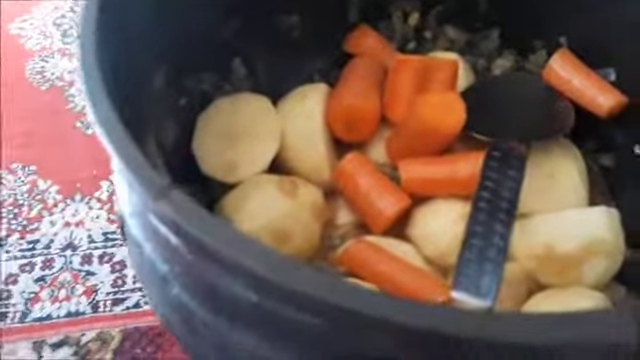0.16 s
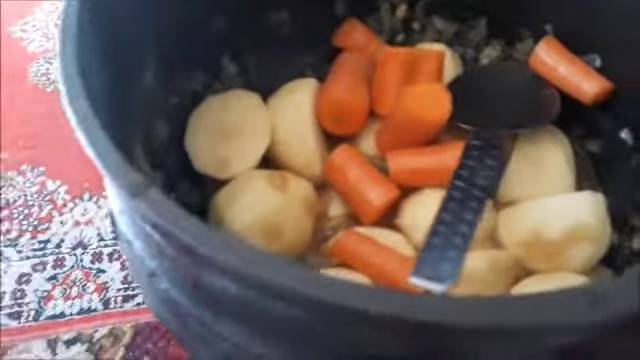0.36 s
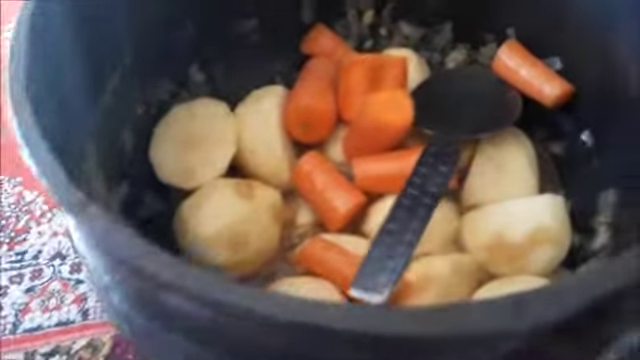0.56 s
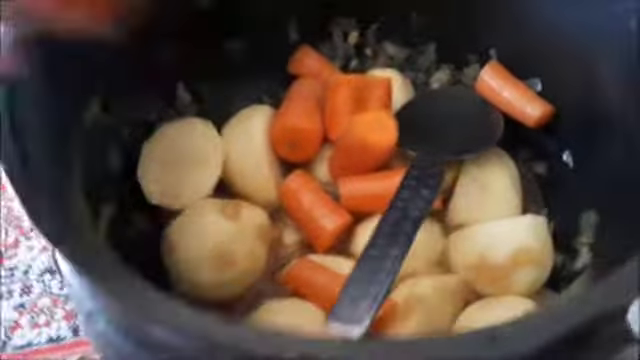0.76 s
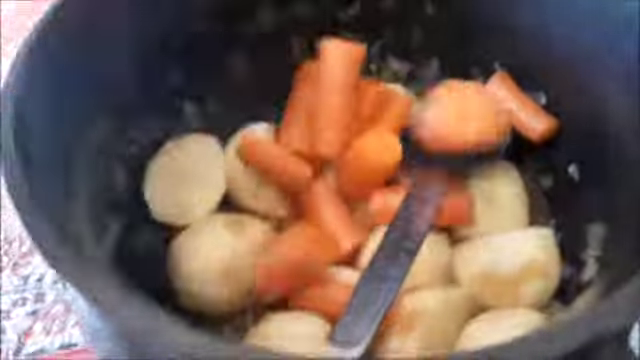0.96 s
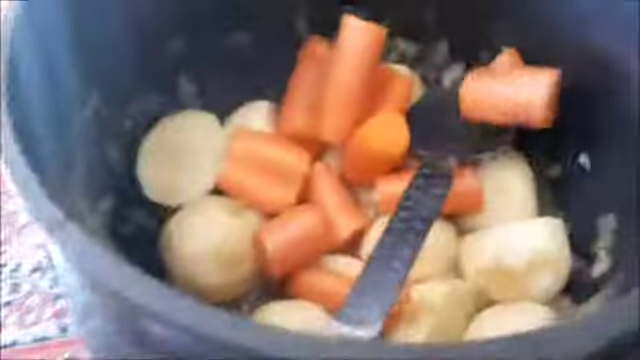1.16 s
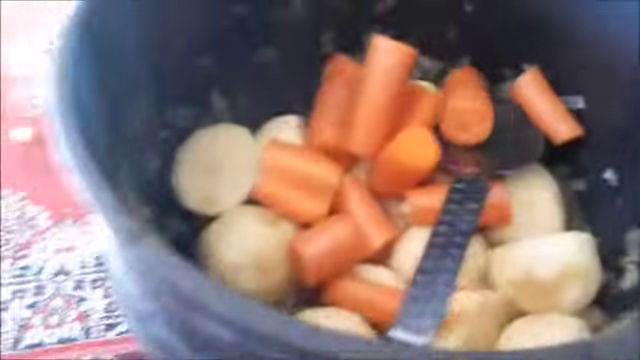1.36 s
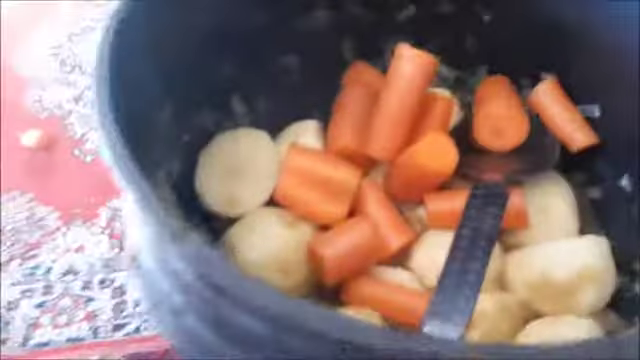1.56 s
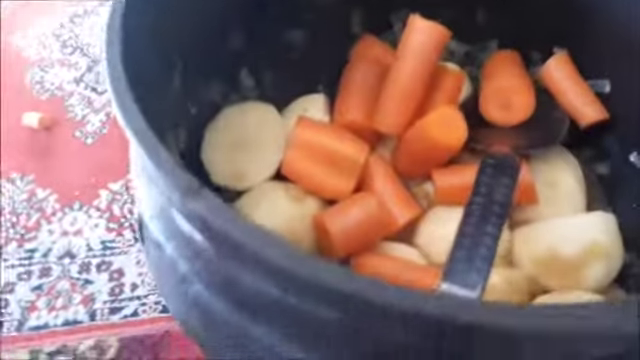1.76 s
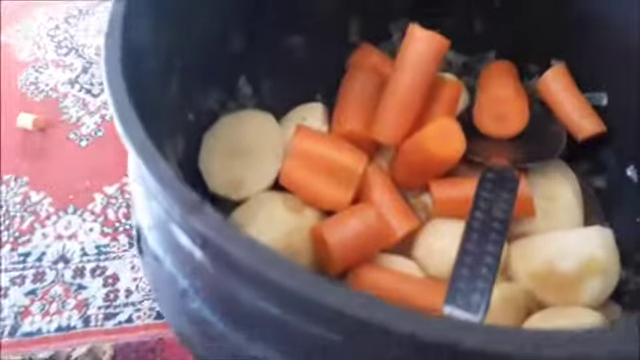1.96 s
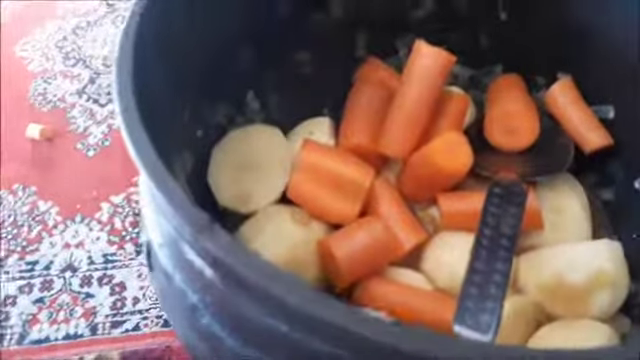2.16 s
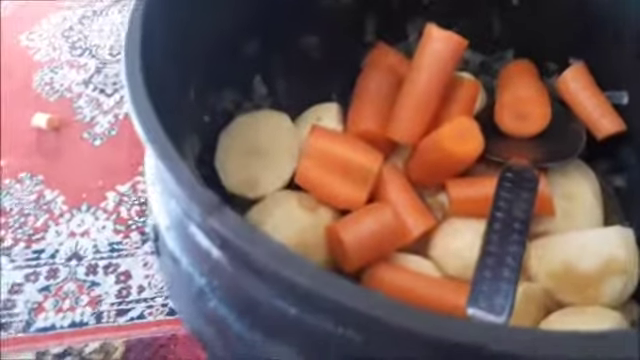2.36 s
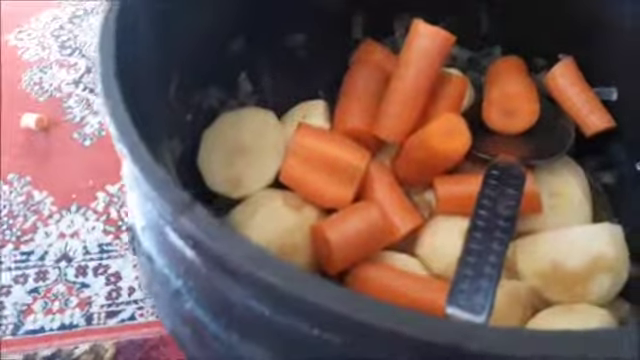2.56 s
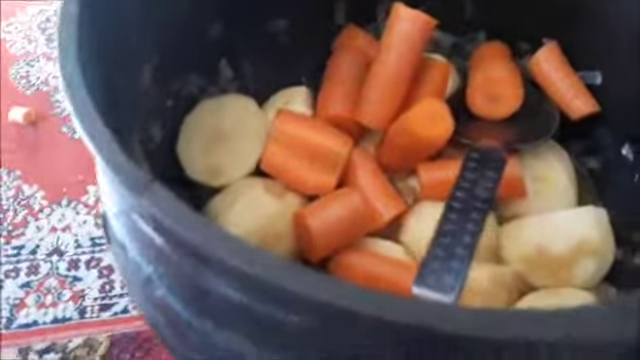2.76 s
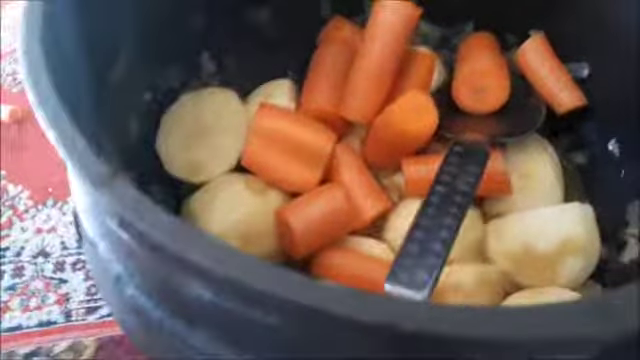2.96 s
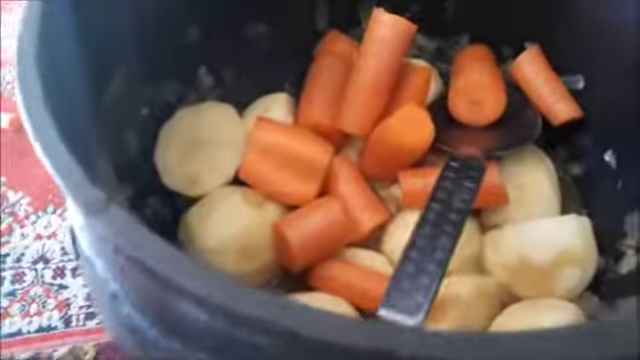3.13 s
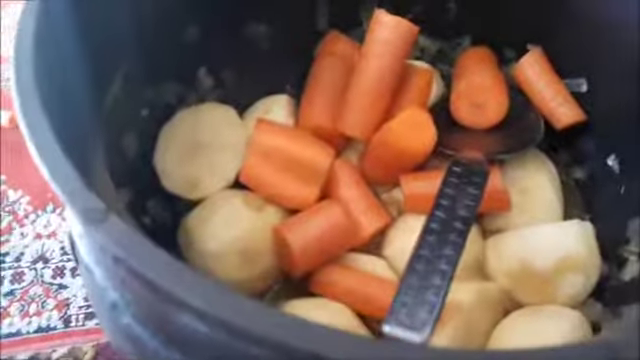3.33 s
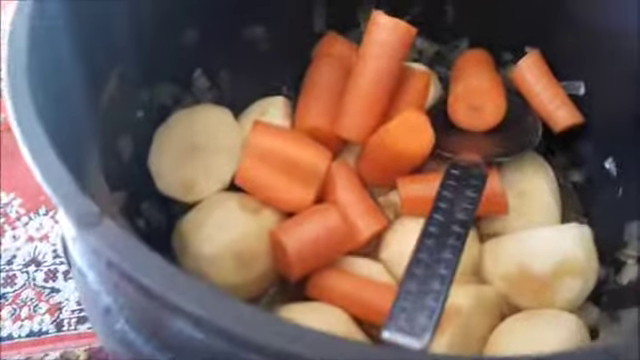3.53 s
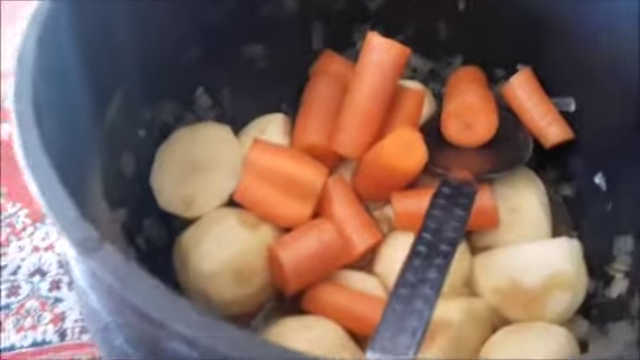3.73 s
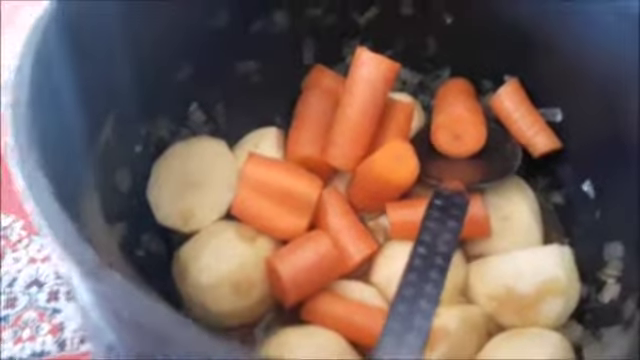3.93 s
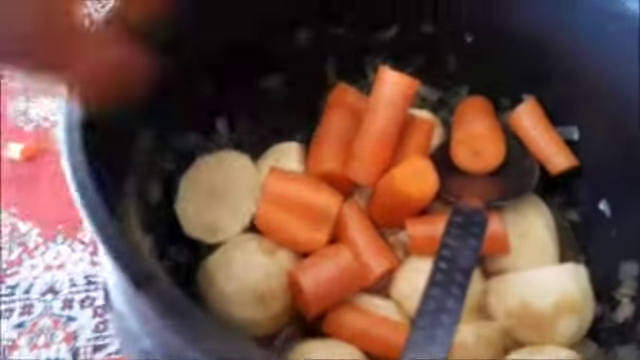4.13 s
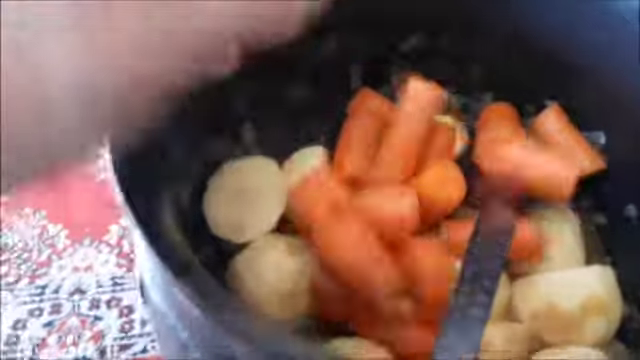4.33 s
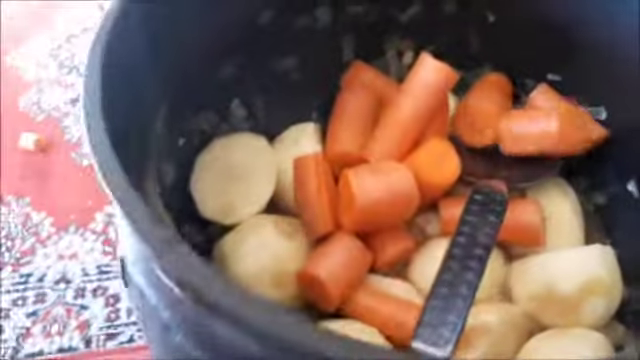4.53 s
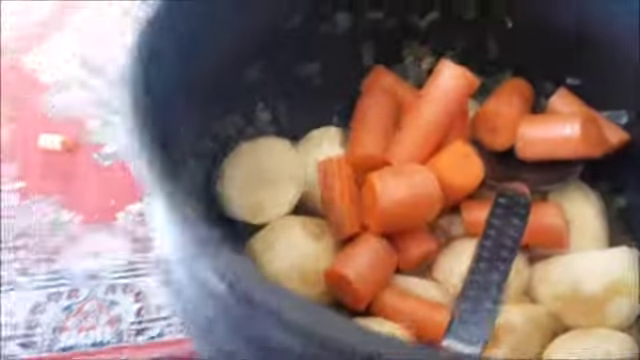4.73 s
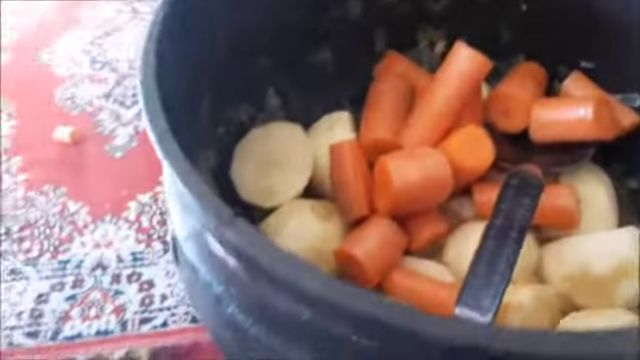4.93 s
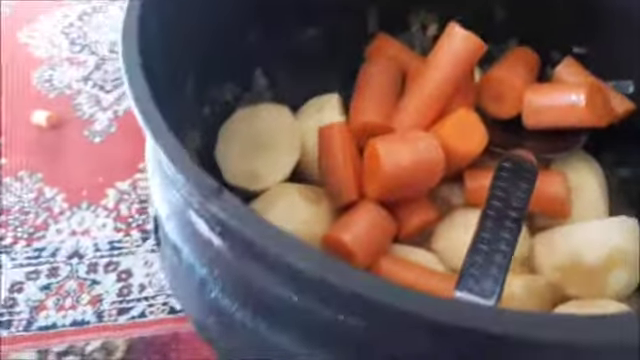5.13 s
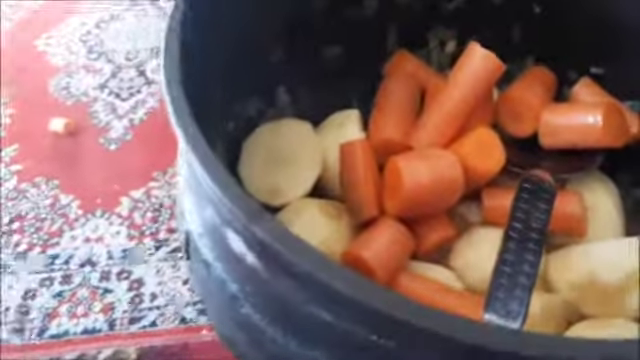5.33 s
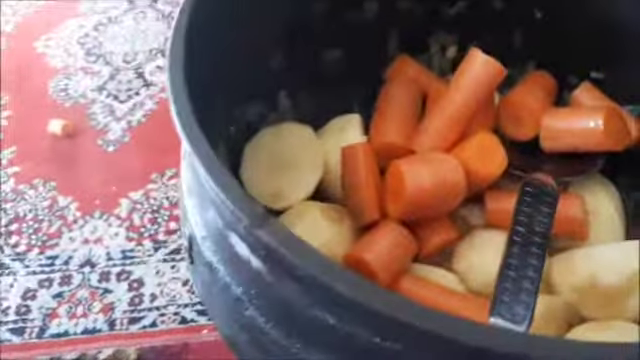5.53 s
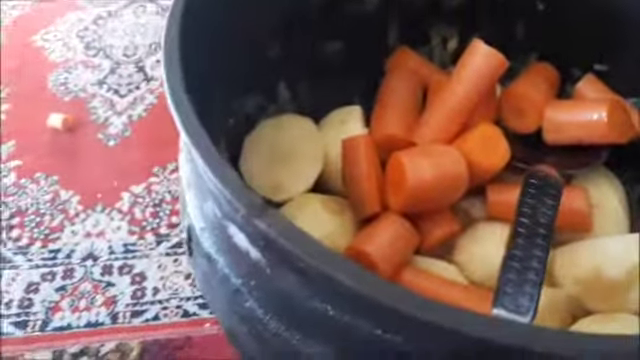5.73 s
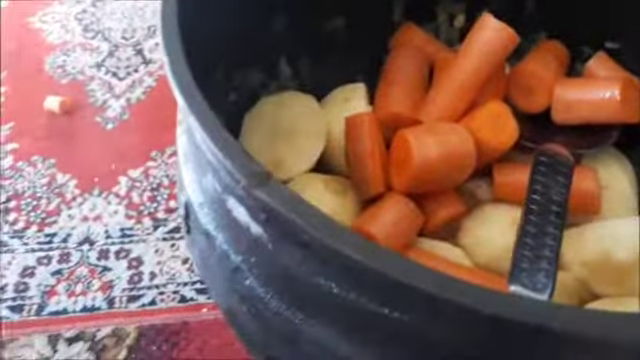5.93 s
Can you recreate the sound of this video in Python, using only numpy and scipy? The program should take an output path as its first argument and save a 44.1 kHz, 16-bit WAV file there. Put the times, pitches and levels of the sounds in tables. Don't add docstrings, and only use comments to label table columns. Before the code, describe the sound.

A quiet outdoor yard opens with a low hollow hum, airy hiss, distant high insect chirring and a slight cloth rustle with faint chirps. A soft knock comes at 0.4 seconds and thin peeps around 0.75. Just before 1.0, a handful of carrot pieces falls into a cast iron pot: dull vegetable thuds, then a dense bright clatter of steel spoon on iron until about 1.2, with a short hollow ring. Lighter rolling clinks follow at 1.3-1.45. The background dips, then creeps back, with tiny squeaks near 1.6. A close, thin insect buzz swells at 2.6-3.0, among faint leaf rustles and dry crackles until 3.2. At 4.4 a second handful lands with heavier low thumps and a compact metallic rattle; at 4.65 the spoon slips, knocking the wall briefly. The yard sinks quieter, then gently returns, with a soft rustle near 5.9. Close small microphone, little echo.

```python
import sys
import numpy as np
from scipy import signal
from scipy.fft import rfft, irfft
from scipy.io import wavfile
from scipy.ndimage import uniform_filter1d

SR = 44100
rng = np.random.default_rng(int(sys.argv[2]) if len(sys.argv) > 2 else 0)


def persist_wave(psi):
    counts = np.round(np.clip(psi, -1, 1) * 32767).astype(np.int16)
    wavfile.write(sys.argv[1], SR, np.atleast_2d(counts).T)


def rack_gain(trim_db):
    fader = np.asarray(trim_db, float)
    return 10 ** (fader / 20)


N = 268569


def evened(x):
    return x / np.sqrt(np.mean(x ** 2) + 1e-20)


def read_curve(points, hz):
    f, value = np.transpose(points)
    return np.interp(np.log(hz + 1), np.log(f + 1), value)


def add(mix, start_s, sound):
    part = mix[round(start_s * SR):][:len(sound)]
    part += sound[:len(part)]


def coloured(x, points):
    hz = np.fft.rfftfreq(len(x), 1 / SR)
    return irfft(rfft(x) * rack_gain(read_curve(points, hz)), len(x))


def ring(x, hz, t60):
    radius = 10 ** (-3 / (max(t60, .003) * SR))
    step = 2 * np.pi * hz / SR
    return signal.lfilter([np.sin(step)], [1, -2 * radius * np.cos(step), radius ** 2], x)


def resonate(x, hz, width_hz):
    turn = np.exp(2j * np.pi * np.cumsum(hz * np.ones(len(x))) / SR)
    r = np.exp(-np.pi * width_hz / SR)
    smooth = signal.lfilter([(1 - r) ** 2], [1, -2 * r, r * r], x / turn)
    return 2 * (turn * smooth).real


def gliding_noise(length_s, start_hz, end_hz, level_db, width_hz):
    size = round(length_s * SR)
    hz = np.interp(np.arange(16384), [0, size], [start_hz, end_hz])
    fuzz = evened(resonate(rng.standard_normal(16384), hz, width_hz))[:size]
    return rack_gain(level_db) * fuzz * signal.windows.tukey(size, .3) * np.linspace(1, .45, size)


def porch(x, t60=0.28):
    t = np.arange(SR // 2) / SR
    tail = rng.standard_normal(len(t)) * rack_gain(-60 * t / t60) * (1 - np.exp(-t / 0.024))
    return signal.oaconvolve(x, tail / np.linalg.norm(tail))[:len(x)]


# time_s, level_db
YARD_LEVEL = [(0, 1.5), (.14, 3), (.29, 1), (.43, 2.5), (.7, 1.5), (.9, 3.5), (1.3, 3.4), (1.58, -2.5),
              (1.9, 0), (2.35, 0.1), (2.9, 2.5), (3.24, 0.9), (4.36, 1.2), (4.9, -6), (5.27, -4), (5.55, -0.8),
              (5.95, -.4), (6.09, 3.5)]


def yard_level_db(time_s):
    return np.interp(time_s, *np.transpose(YARD_LEVEL))


# freq_hz, density_db (per Hz)
YARD_SPECTRUM = [(15, -56.5), (25, -30.5), (102, -15.5), (357, -5.5), (456, -15), (1120, -10),
                 (1280, -11.5), (3300, -19), (3780, -15.5), (4100, -29.5), (7650, -34), (8530, -33.5),
                 (9770, -45.5), (15100, -32.5), (16400, -58)]
# freq_hz, width_hz, lift_db
POT_CAVITY = [
    (260, 17, 3.5),
    (372, 44, 6.5),
    (800, 74, 7),
    (1051, 30, 6),
    (2110, 61, 8),
]
# rest_db, level_share (dB per dB of the yard's level curve)
YARD_LAYERS = [
    (-52.5, 1.06),
    (-55., 1.02),
    (-59., 1.04),
]


def yard():
    frames, hz = N // 256 + 5, np.fft.rfftfreq(1024, 1 / SR)
    real, imag, patches = rng.standard_normal((frames, 513, 3)).T
    patches = uniform_filter1d(patches, 10, 0)
    patches = evened(uniform_filter1d(patches, 8, 1))
    bed_db = yard_level_db(np.arange(frames) * 256 / SR)
    shape_db = read_curve(YARD_SPECTRUM, hz)
    for f, width_hz, lift_db in POT_CAVITY:
        shape_db = shape_db + lift_db / (1 + (2 * (hz - f) / width_hz) ** 2)
    level = np.zeros(real.shape)
    for (rest_db, share), (low, high) in zip(YARD_LAYERS, ((0, 600), (600, 3600), (3600, SR))):
        band = rack_gain(shape_db) * (hz >= low) * (hz < high)
        level += np.outer(band / np.linalg.norm(band), rack_gain(rest_db + share * bed_db))
    spectra = level * (real + 1j * imag) * rack_gain(1.7 * patches)
    return 0.76 * signal.istft(spectra, nperseg=1024, noverlap=768)[1][:N]


# freq_hz, width_hz, level_db
FAR_INSECTS = [
    (3810, 450, -69.5),
    (8626, 380, -68),
]


def chorus():
    swell = rack_gain(0.98 * yard_level_db(np.arange(N) / SR))
    bands = np.zeros(N)
    for hz, width_hz, level_db in FAR_INSECTS:
        bands += rack_gain(level_db) * evened(resonate(rng.standard_normal(N), hz, width_hz))
    return swell * bands


# start_s, length_s, peak_db, pitch_hz
NEAR_BUZZ = [
    (0.0, .35, -63, 8900),
    (1.784, .17, -58, 8900),
    (2.58, .47, -43.5, 9200),
]


def buzz(length_s, peak_db, pitch_hz):
    t = np.arange(0, length_s, 1 / SR)
    from_peak = np.interp(t / length_s, [0, 0.44, 1], [1, 0, 1])
    wobble, noise = rng.standard_normal((SR // 2, 2))[:len(t)].T
    stroke_hz = 85 * (1 + 0.57 * evened(uniform_filter1d(wobble, 600)))
    strokes = np.cumsum(stroke_hz) / SR
    clicks = noise * (.5 + np.exp(-(strokes % 1) / 0.84))
    wing_hz = pitch_hz - 1300 * t - 700 * np.exp(-t / .035)
    wings = resonate(resonate(clicks, wing_hz, 640), wing_hz, 640)
    level = rack_gain(peak_db - 29.5 * from_peak ** 2.4)
    return level * evened(wings) * signal.windows.tukey(len(t), .1)


# start_s, length_s, centre_hz, level_db, width_hz
RUSTLES = [
    (0.049, 0.14, 345, -45.5, 352),
    (0.037, 0.1, 1260, -52.5, 1780),
    (0.045, 0.11, 6130, -59.5, 4000),
    (2.664, .33, 6520, -61, 3520),
    (3.131, 0.1, 9220, -62.5, 4000),
    (5.926, 0.18, 800, -57.5, 893),
]


def rustle(length_s, centre_hz, level_db, width_hz):
    return gliding_noise(length_s, centre_hz, centre_hz, level_db, width_hz)


# start_s, length_s, start_hz, end_hz, level_db
PEEPS = [
    (0.041, 0.025, 1590, 1630, -44),
    (0.053, 0.063, 1970, 2180, -56),
    (0.152, 0.113, 6250, 6550, -59.5),
    (0.738, 0.1, 4320, 4200, -58),
    (0.802, 0.088, 4750, 4800, -61),
    (1.523, 0.095, 3980, 3850, -57),
    (1.607, 0.051, 5900, 6260, -64),
    (1.65, .04, 5720, 5700, -67.5),
    (1.703, 0.083, 4910, 5140, -63.5),
]


def peep(length_s, start_hz, end_hz, level_db):
    return gliding_noise(length_s, start_hz, end_hz, level_db, width_hz=210)


# start_s, level_db, pitch_hz, t60_s, tick_db
THUDS = [(0.043, -47.5, 331, 0.079, 6), (0.384, -33.5, 313, 0.04, 1), (.404, -35.5, 260, 0.1, -28.),
         (.943, -35.5, 1150, 0.022, -5.), (.978, -25.5, 385, 0.05, -4), (1.01, -26.5, 870, 0.068, -31.5),
         (1.021, -28.5, 430, 0.11, -25.), (1.104, -31.5, 800, 0.031, -28), (4.383, -19.5, 374, 0.017, 0.5),
         (4.400, -22.5, 304, 0.026, -25), (4.417, -18, 415, 0.025, -24.5), (4.455, -46, 856, 0.24, -29),
         (4.44, -36.5, 197, 0.23, -29.5), (1.385, -55, 870, 0.11, -30), (4.647, -35.5, 888, 0.021, -4),
         (4.668, -37.5, 450, 0.036, -30)]


def thud(level_db, pitch_hz, t60, tick_db):
    t = np.arange(6000) / SR
    puff = rng.standard_normal(len(t))
    push = np.sin(2 * np.pi * pitch_hz * t) + .5 * evened(resonate(puff, pitch_hz, 430))
    push = push * rack_gain(-60 * t / max(t60, .01)) * (1 - np.exp(-t / 0.00057))
    dull_tick = coloured(puff, [(500, 0), (4500, -5), (6500, -30)]) * np.exp(-t / .003)
    return rack_gain(level_db) * (push + rack_gain(tick_db) * dull_tick)


def rebounds(blows, chatter_s, full_db, bright_db):
    rows = np.zeros((len(blows), 3 * SR // 4))
    t = np.arange(4096) / SR - .002
    for row, (start_s, level_db, edge_db) in zip(rows, blows):
        low_db = full_db - 0.58 * level_db
        chance, sign = rng.random(len(t)), rng.standard_normal(len(t))
        envelope = np.exp(-t / max(chatter_s, .001)) * (1 - np.exp(-abs(t) / .0006))
        burst = sign * (chance < 4000 / SR) * np.where(t > 0, envelope, 0)
        colour = [(300, low_db - 22.5), (2000, low_db + 8.5), (5500, edge_db), (8500, 0),
                  (13000, 0.94 * edge_db + bright_db)]
        burst = coloured(burst / np.linalg.norm(burst), colour)
        add(row, start_s - blows[0][0], rack_gain(level_db) * burst)
    return rows


def struck(rows, spread_db):
    return rack_gain(spread_db * rng.standard_normal(len(rows))) @ rows


def metal(rows, modes, body_db):
    out = np.zeros(rows.shape[1])
    for hz, level_db, t60 in modes:
        blow = struck(rows, 3)
        free_t60 = t60 * min(1, (1800 / hz) ** 0.34)
        out += rack_gain(body_db + level_db) * ring(blow, hz, free_t60)
        out += rack_gain(body_db + 1.2 * level_db + 8.5) * ring(blow, 1.003 * hz, min(1.4 * t60, .09))
    return out


# freq_hz, level_db, t60_s
POT_BELLY = [
    (483.7, -49, 0.46),
    (870, -51, 0.19),
    (1326, -56, .45),
    (2386, -63.5, 0.6),
]


def pot_belly(rows, belly_db):
    drive = rows.sum(0)
    return sum(rack_gain(level_db + belly_db) * ring(drive, hz, t60) for hz, level_db, t60 in POT_BELLY)


# freq_hz, level_db, t60_s
SPOON_MODES = [(1373, -21, 0.38), (1330, -27, 0.47), (2462, -41.5, 2.3), (3613, -3, 0.27),
               (4360, -22.5, 0.29), (4673, -55, 0.21), (5132, 3.5, 0.19), (5660, 1.5, 0.28),
               (6190, -7.5, 0.35), (7913, -24.5, 0.22), (8220, -44.5, 0.13), (8550, -2.5, 0.21),
               (8950, -32.5, 0.15), (8900, -30, 0.22), (8830, -1.5, 0.39), (9200, -46.5, 0.13),
               (9660, -28.5, 0.15), (9940, -7, 0.25), (10370, -45.5, 0.26), (10860, -2, 0.25),
               (11210, -38, 0.11), (12010, 7.5, 0.38), (12100, -40, 0.14), (13260, -40.5, 0.17),
               (13500, -22, 0.11), (15600, -12, 0.13), (14008, -4.5, 0.3), (14700, -23, 0.16),
               (14600, -24.5, 0.14), (15170, -7, 0.18)]


def spoon(rows, spoon_db):
    return metal(rows, SPOON_MODES, spoon_db)


# freq_hz, level_db, t60_s
POT_MODES = [(1313, -15.5, 1), (1344, -4, 0.21), (2108, -3, 0.28), (2388, -4.5, 0.67), (3148, -29.5, 0.18),
             (3600, -26, 0.38), (3663, -7, 0.35), (4570, -13, .45), (5270, -12.5, 0.42), (5450, 3.5, 0.22),
             (5620, -8.5, 0.21), (6080, -20, 0.57), (6471, -27, 0.17), (6680, -8, 0.28), (7790, -5.5, 0.25),
             (8340, -41, 0.15), (7850, -19, 0.23), (8406, 1.5, 0.44), (8850, -11, 0.59), (9900, -4, 0.26),
             (11300, -24.5, 0.31), (11000, -23, 0.22), (11300, -20, 0.37), (11965, -2.5, 0.2),
             (13300, -8, 0.2), (12970, -17.5, 0.082), (13630, -9.5, 0.3), (14400, -32, 0.19),
             (14590, -31, 0.2), (14200, -11.5, 0.076)]


def pot_wall(rows, pot_db):
    return metal(rows, POT_MODES, pot_db)


# freq_hz, width_hz, level_db
CLATTER_CLUSTERS = [(1270, 38, -39.5), (2165, 39, -4.5), (2504, 32, -7.5), (3100, 60, -12.5),
                    (3458, 53, -19), (4527, 34, -1.5), (5000, 34, -6), (5830, 36, -0.5), (5800, 45, -4.5),
                    (6340, 58, 1), (6830, 37, -6.5), (1684, 70, -7), (8250, 22, -15), (8390, 60, 3),
                    (8760, 44, -4.5), (10050, 39, -3), (11000, 65, -3.5), (12025, 45, -8),
                    (12900, 60, -4.5), (13080, 67, -17.5), (13650, 37, -2), (13600, 39, -14),
                    (14530, 84, 6), (16100, 40, -8)]


def clatter(rows, clatter_db):
    out = np.zeros(rows.shape[1])
    for hz, width_hz, level_db in CLATTER_CLUSTERS:
        blow = struck(rows, 4)
        for spread, t60 in zip(np.linspace(-1.6, 1.6, num=6), rng.uniform(0.031, 0.075, size=6)):
            gain = rack_gain(level_db + clatter_db - 2.9 * spread ** 2)
            out += gain * ring(blow, hz + spread * max(width_hz, 90.), t60)
    return out


def tumble(blows, chatter_s, full_db, spoon_db, pot_db, clatter_db, bright_db, belly_db):
    rows = rebounds(blows, chatter_s, full_db, bright_db)
    out = pot_belly(rows, belly_db) + spoon(rows, spoon_db) + pot_wall(rows, pot_db) + clatter(rows, clatter_db)
    out += rack_gain(clatter_db + 21.5) * porch(rows.sum(0), t60=.05)
    return blows[0][0] - .0035, out + rack_gain(-22.0) * porch(out)


# start_s, level_db, edge_db (weight near 5.5 and 13 kHz against 8.5 kHz)
FIRST_BLOWS = [(0.9822, -20.5, -2), (0.9926, -15, -5), (1.0161, -9.5, -5.5), (1.0321, -5.5, -12),
               (1.0514, -25, -2), (1.1054, -12, -7.5), (1.1114, -3.5, -6.5), (1.1214, -5.5, -4),
               (1.1344, -5.5, -7.5), (1.1474, -8, 5.5), (1.1594, -24, -0.5), (1.1794, -17.5, -15),
               (1.1944, -23, -18)]


def first_handful():
    return tumble(FIRST_BLOWS, chatter_s=0.012, full_db=-18., spoon_db=-21.0, pot_db=-28.,
                  clatter_db=-20.5, bright_db=0.5, belly_db=34.0)


# start_s, level_db, edge_db
ROLL_BLOWS = [
    (1.3289, -15, -3.5),
    (1.3374, -20, -2),
    (1.3474, -24.5, -0.5),
    (1.3594, -30, -11),
    (1.3843, -22, 3),
    (1.3944, -22.5, -9.5),
    (1.4300, -30.5, -14.5),
]


def settling_roll():
    return tumble(ROLL_BLOWS, chatter_s=0.0077, full_db=-25.0, spoon_db=-19.0, pot_db=-25.0,
                  clatter_db=-16.5, bright_db=1.0, belly_db=43.0)


# start_s, level_db, centre_hz
TICKS = [
    (2.6094, -61, 5240),
    (2.7, -53, 4010),
    (2.8541, -48, 8050),
    (3.011, -52, 5040),
    (3.1356, -52.5, 6770),
    (3.1647, -59, 4000),
    (3.1894, -54, 7180),
]


def tick(level_db, centre_hz):
    t = np.arange(2000) / SR
    snap = evened(resonate(rng.standard_normal(len(t)), centre_hz, 4500))
    return rack_gain(level_db) * snap * np.exp(-t / 0.0046)


# start_s, level_db, edge_db
SECOND_BLOWS = [(4.3954, -9, -8), (4.4014, -10, 3), (4.4114, -20, -4.5), (4.4234, -16, -11.5),
                (4.4328, -11.5, -7.5), (4.4374, -4, -11), (4.4494, -12, -7.5), (4.4702, -6.5, -6),
                (4.481, -15, 3), (4.4974, -15.5, -0.5), (4.5141, -14, -7.5), (4.5294, -32, -5)]


def second_handful():
    return tumble(SECOND_BLOWS, chatter_s=0.01, full_db=-19.5, spoon_db=-23.5, pot_db=-23.5,
                  clatter_db=-16.5, bright_db=0.6, belly_db=36.0)


# start_s, level_db, edge_db
SLIP_BLOWS = [
    (4.6506, -17.5, -3),
    (4.6551, -10.5, -0.5),
    (4.6694, -15, -7),
    (4.6818, -21.5, -6),
    (4.6994, -33, -23),
]


def spoon_slip():
    return tumble(SLIP_BLOWS, chatter_s=0.0058, full_db=-26.0, spoon_db=-27.5, pot_db=-17.5,
                  clatter_db=-16.5, bright_db=1.5, belly_db=43.0)


def scene():
    mix = yard() + chorus()
    small_sounds = ((buzz, NEAR_BUZZ), (rustle, RUSTLES), (peep, PEEPS), (thud, THUDS), (tick, TICKS))
    for source, events in small_sounds:
        for start_s, *settings in events:
            add(mix, start_s, source(*settings))
    for source in (first_handful, settling_roll, second_handful, spoon_slip):
        add(mix, *source())
    return mix[None]


def roll_off(x):
    return signal.sosfilt(signal.butter(12, 16510, fs=SR, output="sos"), x)


def record(dry):
    power_db = 10 * np.log10(abs(uniform_filter1d(dry[0] ** 2, 400)) + 1e-12)
    fall_db = np.arange(N) * 440.0 / SR
    held_db = np.maximum.accumulate(power_db + fall_db) - fall_db
    over_db = np.maximum(held_db + 16.0, 0)
    ducked = dry / rack_gain(0.3 * uniform_filter1d(over_db, 300))
    ducked = ducked / (1 + abs(ducked / .85) ** 4) ** .25
    hz, _, z = signal.stft(ducked[0], SR, nperseg=1024, noverlap=768)
    band_db = 10 * np.log10(abs(uniform_filter1d(abs(z) ** 2, size=7, axis=0)) + 1e-16)
    top_db = band_db[hz > 1200].max(0)
    tilt_db = read_curve([(200, 2.5), (400, 2.0), (1100, 8.5), (1300, -1.7), (9300, 0.8), (10000, -13.0),
                          (12000, -7.5), (15000, -5.0), (15300, 2.2), (15700, 24.5)], hz)
    under_db = top_db + 0.14 * (top_db + 47.5) - band_db + tilt_db[:, None]
    kept = z * rack_gain(-4.5 * np.clip(under_db - 30.5, 0, 12))
    finished = signal.istft(kept, SR, nperseg=1024, noverlap=768)[1][None, :N]
    return roll_off(finished)


dry = scene()
out = record(dry)
persist_wave(out)
```